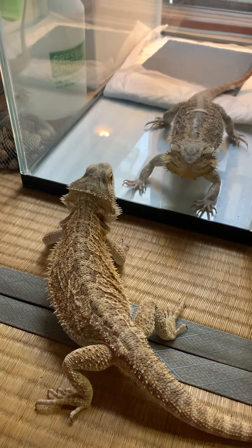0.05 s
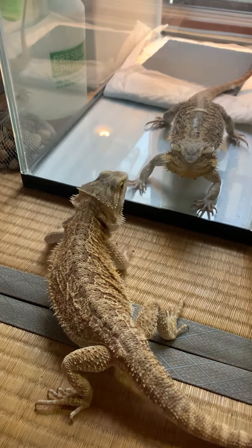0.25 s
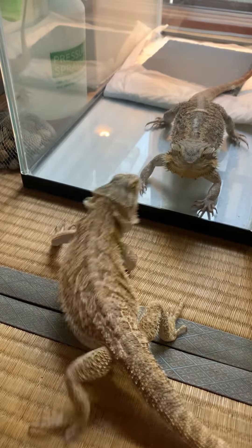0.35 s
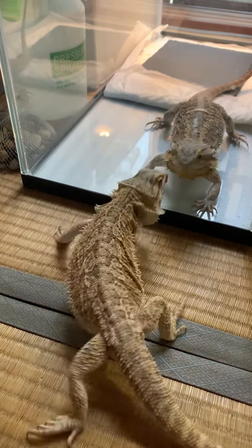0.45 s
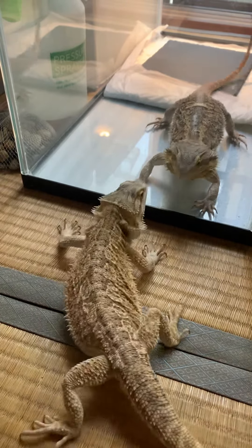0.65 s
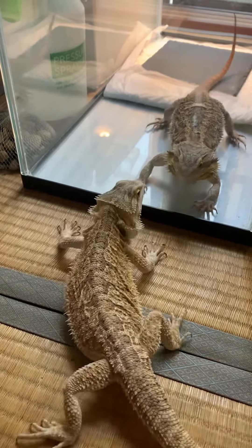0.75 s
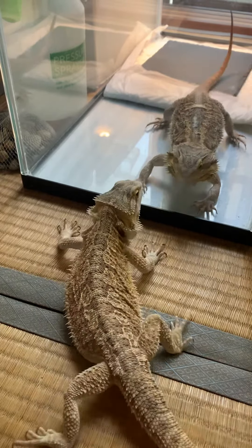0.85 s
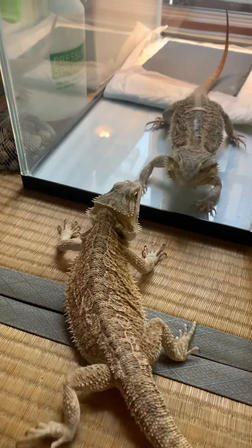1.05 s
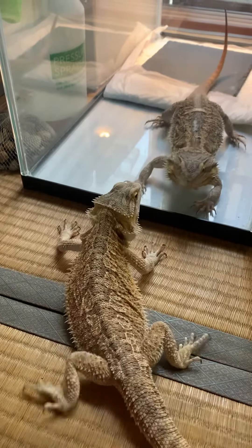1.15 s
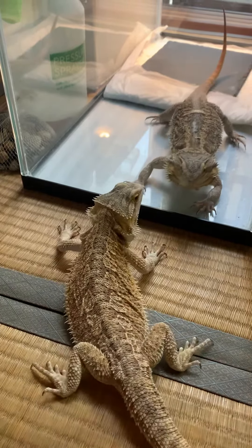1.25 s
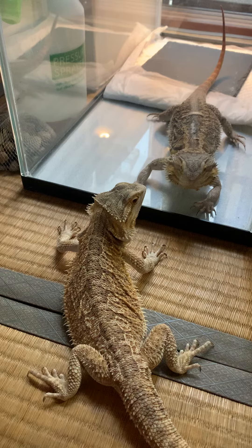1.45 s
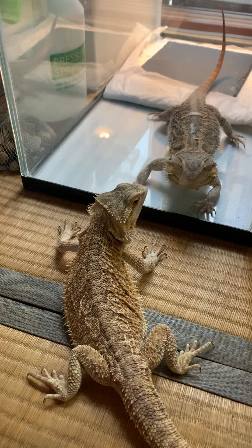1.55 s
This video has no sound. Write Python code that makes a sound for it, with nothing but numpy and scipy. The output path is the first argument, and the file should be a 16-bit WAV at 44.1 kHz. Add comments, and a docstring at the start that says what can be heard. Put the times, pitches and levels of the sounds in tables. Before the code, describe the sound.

A lizard's claws scratch over a woven straw mat close to the microphone. A soft thud, a brief skidding rasp and a low knock come first, then lighter scuffs and ticks, over faint hum in a small quiet room.

```python
"""Bearded dragon on a straw mat

The lizard shuffles over woven straw in a glass tank in a small quiet room, close to a phone.
Claws and scales catch on the fibres in short scuffs, single ticks and one skidding rasp. Its body
lands with a soft thud, then a foot slips and knocks the floor. Mains hum and faint air lie underneath."""
import sys
import numpy as np
from scipy import signal
from scipy.fft import rfft, irfft
from scipy.io import wavfile

SR = 44100
rng = np.random.default_rng(int(sys.argv[2]) if len(sys.argv) > 2 else 0)


def generate_wav(signal):
    """Clip the signal to [-1, 1] and save it as 16-bit WAV at the path in sys.argv[1]."""
    frames = np.transpose(np.atleast_2d(signal))
    scaled = np.clip(frames, -1, 1) * 32767
    pcm = np.round(scaled).astype(np.int16)
    wavfile.write(sys.argv[1], SR, pcm)


N = 70560
TOP_HZ = 15750
REFLECTIONS_ALIKE_HZ = 890  # below this, reflections are alike at both microphone ports


def scuffs(t, catches_per_s=2500, spread_db=2.4, rub_db=-4, weave_per_s=170, weave_db=2.33):
    """Claws and scales drag over the straw: each stroke is a dense run of tiny catches over rubbing."""
    # strokes over the weave: t/s, length/s, level/dB, swell over the stroke/dB, tilt/(dB per octave)
    strokes = [(0.19, 0.11, -61.5, 1, -2.5), (0.312, 0.02, -53.5, 13.5, -4), (0.331, 0.027, -35, -4, -1),
               (0.364, 0.0084, -42.5, -3, -2.5), (0.387, 0.012, -43, 10, -1.7),
               (0.421, 0.093, -44, -4.5, -5.5), (0.486, 0.033, -53, -6, 1.5),
               (0.548, 0.081, -56, 5.5, -2.4), (0.64, 0.21, -66.5, -4.5, -4.5),
               (0.712, 0.0088, -57, 2.5, -2), (0.802, 0.029, -52.5, 1.5, -1.5),
               (0.871, 0.043, -52, 8, -0.6), (0.913, 0.02, -50, 0, -1.3), (0.984, 0.034, -58, 8, -3),
               (1.021, 0.021, -44, 4, 0), (1.059, 0.043, -54, 4, -1.6), (1.115, 0.059, -59, -2.5, -2.9)]
    attack_s, release_s = 0.008, 0.011
    out = np.zeros(N)
    for start, length, db, swell_db, tilt in strokes:
        sizes = undb(spread_db * np.minimum(rng.exponential(size=N), 4)) * rng.choice([-1, 1], N)
        catches = unit(sizes * (rng.random(N) < catches_per_s / SR))
        rubbing = undb(rub_db) * rng.standard_normal(N)
        grip = undb(weave_db * walk(weave_per_s))  # tightens and slackens from straw to straw
        friction = unit((catches + rubbing) * grip)
        age = t - start
        attack = .5 + .5 * np.tanh(2 * age / attack_s - 1)
        release = np.exp(-np.maximum(age - length, 0) / release_s)
        swell = undb(swell_db * (np.clip(age / length, 0, 1) - .5))
        out += undb(db) * colour(friction * attack * swell * release, straw_spectrum(), tilt)
    return out


def ticks(t, rise_s=0.0002, decay_s=0.0005, rustle_db=-19, rustle_s=0.0023):
    """A claw snaps off a straw, which rustles briefly as it springs back."""
    # claw snaps: t/s, level before the low cut/dB, tilt/(dB per octave)
    snaps = [(0.423, -46, -1), (0.4556, -39, 0), (0.4738, -34, 5), (0.4855, -36, 0), (0.4881, -27.5, -1),
             (0.6248, -43.5, 0), (0.7195, -54, 0), (0.829, -49, 1), (0.8723, -52, 0), (0.9275, -42, 1),
             (0.936, -34.5, -1), (1.0062, -40.5, 0), (1.0345, -41, 0), (1.0420, -42, 3), (1.0480, -42, 0),
             (1.059, -46, 1), (1.0738, -45, 1), (1.0940, -45, 4), (1.1024, -37, 5), (1.1165, -45.5, 2),
             (1.1895, -49.5, -2.5), (1.408, -61, -3)]
    level_span_s = 0.001  # each tick carries the energy of its level held this long
    low_cut_hz = 1400  # a single straw is too small to radiate bass
    out = np.zeros(N)
    for start, db, tilt in snaps:
        age = t - start
        envelope = fade(-age, rise_s) + fade(age, decay_s) + undb(rustle_db) * fade(age, rustle_s)
        tick = colour(envelope * rng.choice([-1, 1], N), straw_spectrum(), tilt)
        out += undb(db) * unit(tick) * np.sqrt(level_span_s * SR / N)
    return signal.sosfilt(signal.butter(2, low_cut_hz, "highpass", fs=SR, output="sos"), out)


def rasp(t, start_s=0.333, length_s=0.029, start_hz=960, end_hz=1100, jitter=0.06, level_db=-39):
    """A skidding claw sticks and slips ever faster and rings the mat."""
    # resonances of the mat under the claw: f/Hz, width/Hz, level/dB
    resonances = [(726, 170, 7.5), (1020, 330, 1), (1510, 81, 16.5), (1696, 61, 12), (1940, 160, -1),
                  (2214, 150, 4), (2780, 55, 7), (2886, 194, -1), (3800, 69, -10)]
    progress = np.clip((t - start_s) / length_s, 0, 1)
    slip_hz = (start_hz + (end_hz - start_hz) * progress) * (1 + jitter * walk(start_hz))
    pulses = np.diff(np.floor(np.cumsum(slip_hz) / SR), prepend=0)
    slips = pulses * undb(2.1 * walk(start_hz))
    ring = sum(undb(db) * resonate(slips, hz, width) for hz, width, db in resonances)
    swell = np.sqrt(np.abs(np.sin(np.pi * progress)))
    return undb(level_db) * unit(ring) * swell


def straw_spectrum(ripple_db=2.5, spacing_hz=261.5):
    """The tone of straw, rippled by the chance resonances of one spot on the mat."""
    # spectrum of scratched straw: f/Hz, level/dB
    straw = [(200, -5), (600, -6.5), (1000, -2.5), (1600, -0.5), (2150, 0), (2550, -6.5), (3200, 0),
             (4300, 5), (5200, -1.5), (6500, 3), (9200, -3.5), (12300, -10), (14000, -1), (15500, -3)]
    hz, db = np.array(straw).T
    grid = np.arange(hz[0], SR / 2, spacing_hz)
    ripple = ripple_db * rng.standard_normal(256)[:len(grid)]
    return np.column_stack([grid, np.interp(np.log(grid), np.log(hz), db) + ripple])


def knocks(t):
    """Blows ring the floor; bending waves bring the high notes first and the low ones swell behind."""
    # blows on the floor: t/s, level/dB, tilt about 230 Hz/(dB per octave)
    blows = [(0.276, -48.5, 3.5), (0.3795, -16.5, 4.5), (0.3888, -24.5, 1), (0.3973, -26.5, 2.5),
             (0.433, -39, -0.5), (0.462, -40, -13), (0.488, -37, 9), (1.038, -49.5, 7)]
    # modes of the mat and its boards: f/Hz, level/dB, t60/s
    floor_modes = [(67, -15, 0.082), (114.8, 8.5, 0.058), (139.5, 11.5, 0.046), (186, -9, 0.095),
                   (217.7, -3.5, 0.039), (237, 2, 0.071), (317.5, -18, 0.23), (359, -27, 0.14),
                   (384.4, -5.5, 0.051), (426, -26, 0.023), (653, -17, 0.033), (933.5, -18.5, 0.028),
                   (1004, -23.5, 0.056), (1087, -24.5, 0.03)]
    travel_s = 0.0093  # at 100 Hz
    out = np.zeros(N)
    for start, db, tilt in blows:
        for hz, mode_db, t60 in floor_modes:
            lag_s = travel_s * (np.sqrt(100 / hz) - np.sqrt(100 / 1000))  # 1 kHz arrives on time
            age = np.maximum(t - start - lag_s, 0)
            rise = 1 - np.exp(-(age * hz) ** 2)  # about one cycle long
            ring = rise * fade(age, t60 / np.log(1000)) * np.sin(2 * np.pi * hz * age)
            out += undb(db + mode_db + tilt * np.log2(hz / 230)) * ring
    return out


def thud(t, start_s=0.219, length_s=0.063, start_hz=253, rest_hz=40, fall_s=0.0194, level_db=-28.5):
    """Soft weight lands on the mat: a bending wave that falls in pitch as it passes."""
    age = np.clip(t - start_s, 0, length_s)
    hz = rest_hz + (start_hz - rest_hz) * np.exp(-age / fall_s)
    phase = 2 * np.pi * np.cumsum(hz * (age > 0)) / SR
    swell = np.sin(np.pi * age / length_s) ** 2
    return undb(level_db) * swell * np.sin(phase)


def tank_reflections(x, t, lag_s=0.0005, decay_s=0.001, level_db=-7):
    """The glass tank and the mat throw each scratch back at once, differently to each port."""
    scatter = diffuse(REFLECTIONS_ALIKE_HZ) * fade(t - lag_s, decay_s)
    return undb(level_db) * reflect(x, scatter)


def room(x, t, bass_t60_s=0.45, treble_t60_s=0.15, crossover_hz=1500, predelay_s=0.0015):
    """A small room's short reverb, whose treble dies first."""
    noise = diffuse(REFLECTIONS_ALIKE_HZ)
    bass = signal.sosfilt(signal.butter(2, crossover_hz, fs=SR, output="sos"), noise)
    age = t - predelay_s
    bass_tail = bass * fade(age, bass_t60_s / np.log(1000))
    treble_tail = (noise - bass) * fade(age, treble_t60_s / np.log(1000))
    return reflect(x, bass_tail + treble_tail)


def mains_hum(t, hz=100.2, level_db=-48.5, octave_db=-70):
    """An appliance hums on the mains: one low tone and a trace of its octave."""
    phase = 2 * np.pi * hz * t
    return np.sqrt(2) * (undb(level_db) * np.sin(phase) + undb(octave_db) * np.sin(2 * phase))


def room_air(level_db=-58):
    """The quiet air of the room: a dark, steady bed of noise from all around."""
    # spectrum of the room tone: f/Hz, level/dB
    air = [(20, -32), (45, 5), (75, 0), (130, -2.5), (200, -8.5), (290, -20), (420, -23), (800, -17.5),
           (1400, -14), (2100, -18.5), (3200, -31), (5000, -43.5), (8000, -39.5), (15500, -51)]
    return undb(level_db) * unit(colour(diffuse(alike_hz=1480), air))


def ports(x, left_bass_db=-3, right_lag_s=0.000112, lag_above_hz=2100):
    """Two microphone ports: the left hears less bass, the right hears the treble later."""
    hz = np.fft.rfftfreq(2 * N, 1 / SR)
    treble = (hz / lag_above_hz) ** 6
    lag_s = right_lag_s * treble / (1 + treble)
    left = undb(left_bass_db / (1 + hz / 2500))
    right = np.exp(-2j * np.pi * hz * lag_s)
    return irfft(rfft(x, 2 * N) * np.array([left, right]))[:, :N]


def diffuse(alike_hz, bass_width=0.28):
    """Stereo noise from all around: alike in the bass, unrelated in the treble."""
    mid, side = rfft(rng.standard_normal((2, N)))
    apart = (np.fft.rfftfreq(N, 1 / SR) / alike_hz) ** 2
    width = (apart + bass_width) / (apart + 1)
    return irfft((mid + width * side * np.array([[1], [-1]])) / np.hypot(1, width), N)


def reflect(x, response):
    """Play a mono sound through a stereo impulse response scaled to unit energy."""
    return signal.fftconvolve(x[None], unit(response) / np.sqrt(N), axes=1)[:, :N]


def colour(x, points, tilt_db=0):
    """Causal EQ of unit power through (f/Hz, level/dB) points, tilted per octave."""
    octave = np.log2(np.maximum(np.fft.rfftfreq(2 * N, 1 / SR), 1))
    hz, db = np.array(points).T
    slope_db = tilt_db * np.clip(octave, np.log2(hz[0]), np.log2(TOP_HZ))
    gain = undb(np.interp(octave, np.log2(hz), db) + slope_db)
    gain /= np.sqrt(np.mean(gain[octave < np.log2(TOP_HZ)] ** 2))
    # minimum phase, so nothing rings ahead of an attack
    cepstrum = irfft(np.log(gain))
    cepstrum[1:N] *= 2
    cepstrum[N + 1:] = 0
    return irfft(rfft(x, 2 * N) * np.exp(rfft(cepstrum)))[..., :N]


def resonate(x, hz, width_hz):
    """A resonance applied twice, for steep flanks."""
    b, a = signal.iirpeak(hz, hz / width_hz, fs=SR)
    return signal.lfilter(b, a, signal.lfilter(b, a, x))


def walk(per_s):
    """Random levels joined by lines, at rms 1."""
    return unit(np.interp(np.arange(N) * per_s / SR, np.arange(N), rng.standard_normal(N)))


def fade(age, decay_s):
    """Silence, then an exponential decay from 1."""
    return (age >= 0) * np.exp(-np.maximum(age, 0) / decay_s)


def undb(db):
    """Decibels to gain."""
    return 10 ** (np.asarray(db) / 20)


def unit(x):
    """Scale to rms 1."""
    return x / np.sqrt(np.mean(x ** 2) + 1e-30)


def scene(scratch_send_db=-12, knock_send_db=-15.5):
    """Close scratches and bumps with their reflections, over hum and room tone."""
    t = np.arange(N) / SR
    scratching = scuffs(t) + rasp(t) + ticks(t)
    knocking = knocks(t)
    direct = ports(scratching + knocking + thud(t))
    reverb = room(undb(scratch_send_db) * scratching + undb(knock_send_db) * knocking, t)
    return direct + tank_reflections(scratching, t) + reverb + ports(mains_hum(t)) + room_air()


def record(dry):
    """The phone cuts the top treble steeply."""
    return signal.sosfilt(signal.ellip(10, .2, 80, TOP_HZ, fs=SR, output="sos"), dry)


dry = scene()
out = record(dry)
generate_wav(out)
```